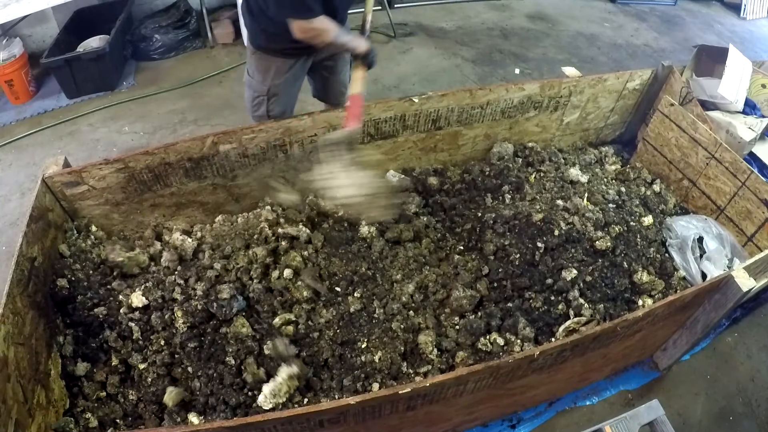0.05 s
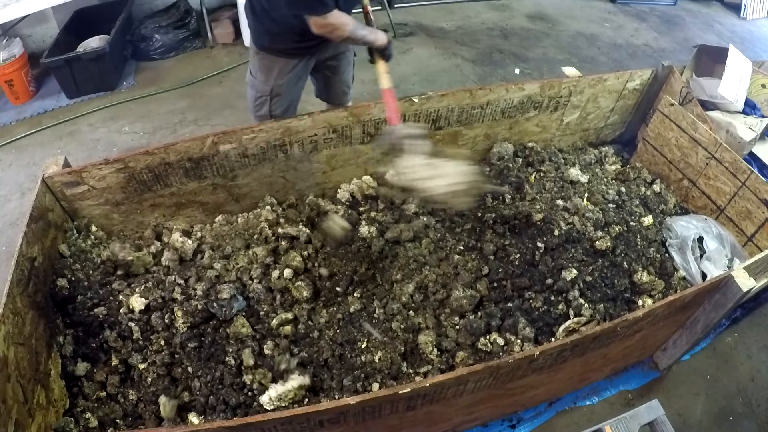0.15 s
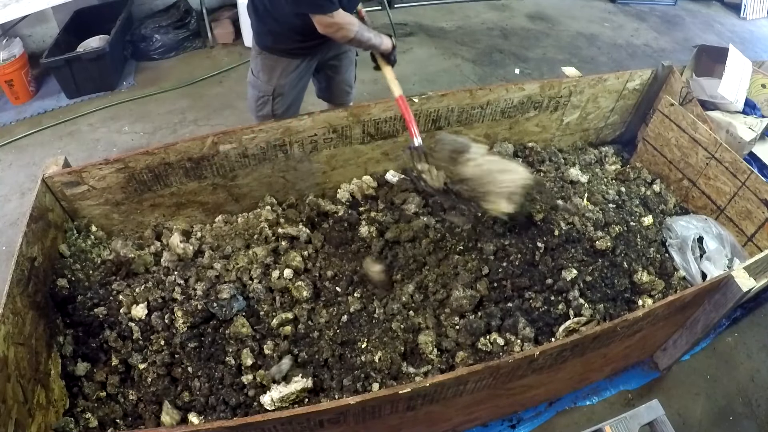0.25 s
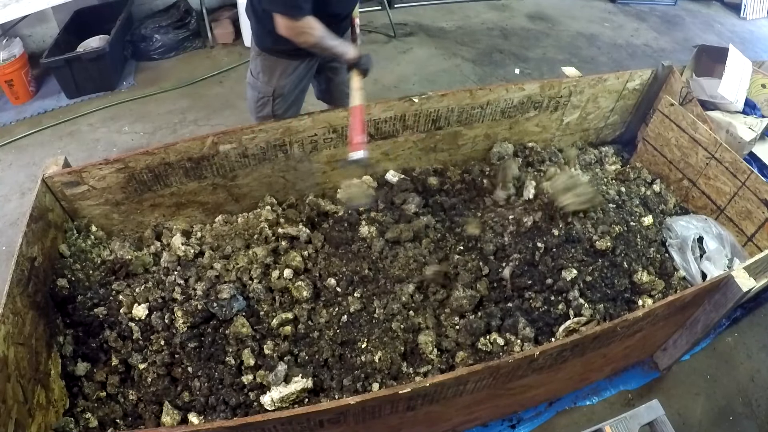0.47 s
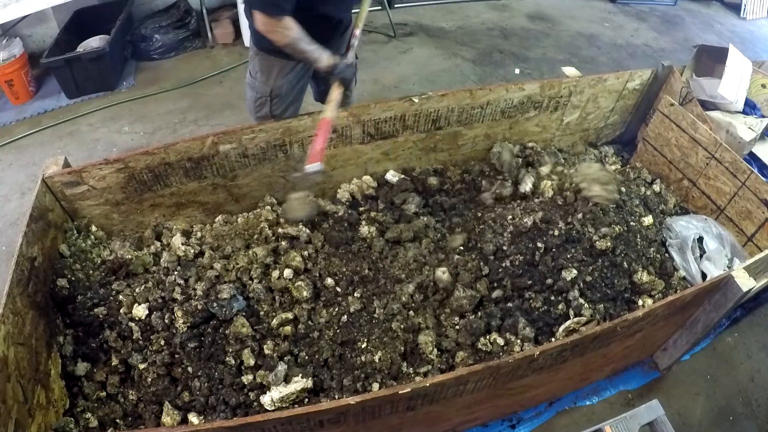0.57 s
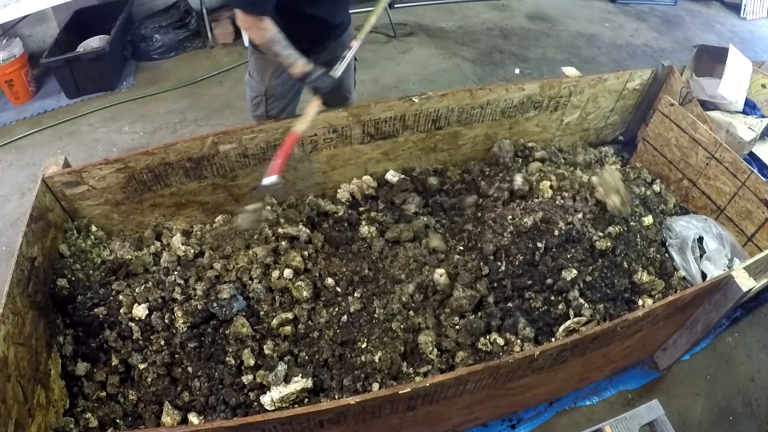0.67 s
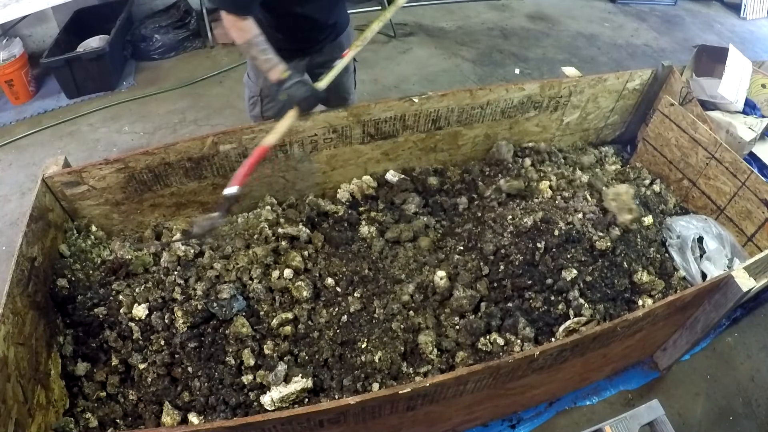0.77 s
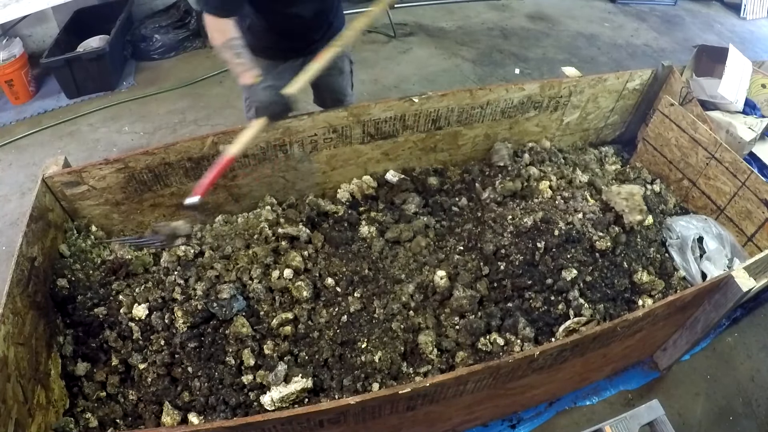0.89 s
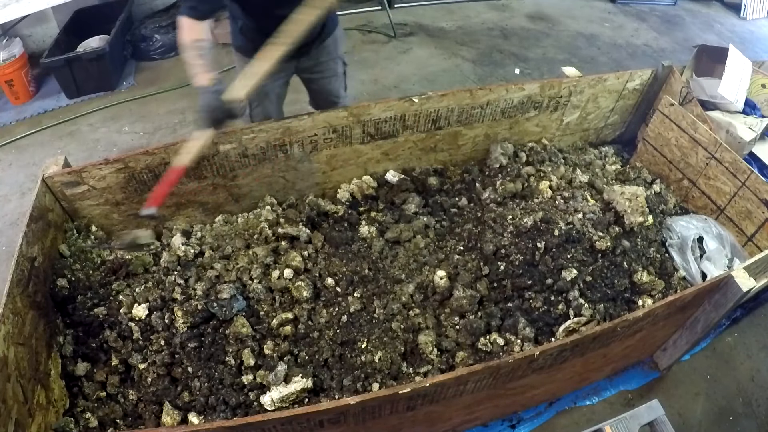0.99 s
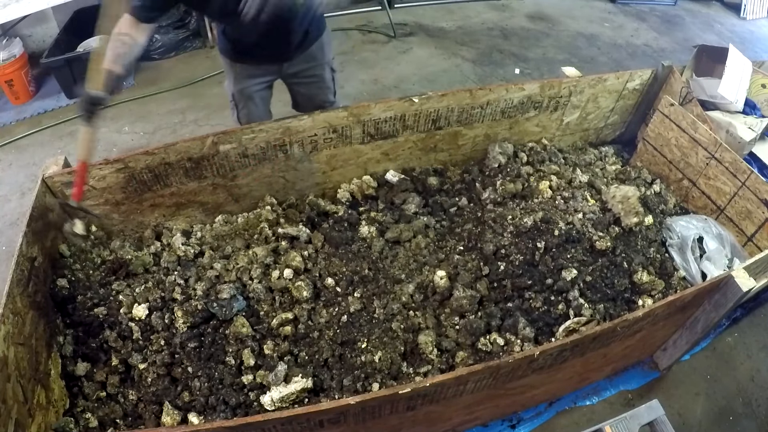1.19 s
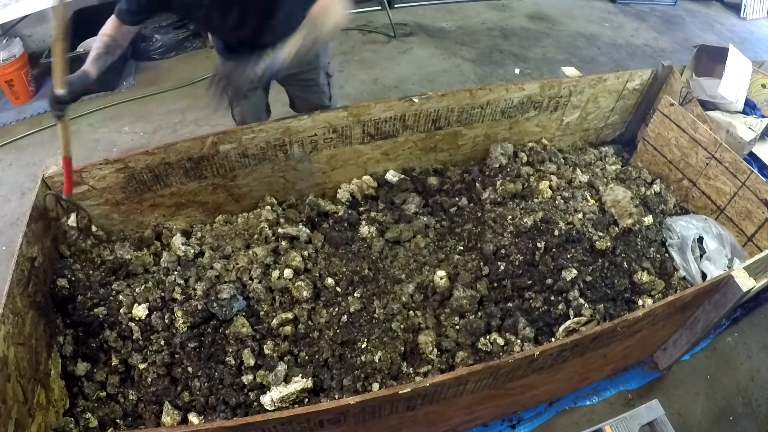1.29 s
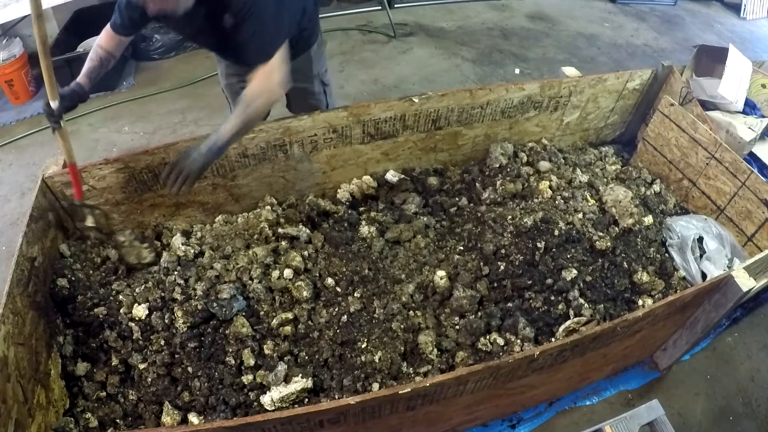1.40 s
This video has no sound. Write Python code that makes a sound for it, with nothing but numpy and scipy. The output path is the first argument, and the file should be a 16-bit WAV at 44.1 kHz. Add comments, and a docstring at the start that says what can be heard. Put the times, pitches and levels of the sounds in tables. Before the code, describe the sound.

A fork turns compost in a wooden bin in a garage. A tossed forkful rustles down and clods patter, with low buffets and one knock near the microphone. The tines clink on the wall, then plunge in with a gritty crunch.

```python
"""A fork turns clumpy compost in a wooden bin in a garage. A flung forkful rustles down, clods patter
and tap the wood, and one crumb knocks close to the microphone, which rumbles with low buffets,
probably of moving air. The steel tines clink on the bin wall, then plunge along the boards and grind
into the gritty heap. Compost is filtered grains and noise; steel and wood ring as decaying modes."""
import sys
import numpy as np
from scipy import signal
from scipy.fft import rfft, irfft
from scipy.io import wavfile
from scipy.ndimage import uniform_filter1d

SR = 44100
rng = np.random.default_rng(int(sys.argv[2]) if len(sys.argv) > 2 else 0)


def to_wav(s):
    """Save 16-bit WAV."""
    ch = np.atleast_2d(s).T  # columns
    pcm = np.round(np.clip(ch, -1, 1) * 32767)  # PCM
    wavfile.write(sys.argv[1], SR, pcm.astype(np.int16))


N = 63945
T = np.arange(N) / SR
CLOD_ATTACK_S, CLOD_T60_S = .0007, .03
STRIKE_ATTACK_S = .0006


def amp(db):
    """Decibels to gain."""
    return 10 ** (np.asarray(db) / 20)


def unit(x):
    """Normalises to rms 1."""
    return x / np.sqrt(np.mean(x ** 2) + 1e-20)


def read(curve, hz):
    """Reads a curve on a log-frequency axis."""
    f, value = np.transpose(curve)
    return np.interp(np.log(hz + 1), np.log(f + 1), value)


def tuned(curve, centre_hz):
    """Turns a curve over frequency ratios into one over Hz."""
    return [(centre_hz * ratio, db) for ratio, db in curve]


def eq(x, curve, tilt_db=0):
    """Minimum-phase EQ of unit power gain, tilted by tilt_db per octave above 200 Hz."""
    size = 8192
    hz = np.fft.rfftfreq(size, 1 / SR)
    gain = unit(amp(read(curve, hz) + tilt_db * np.log2(np.maximum(hz, 200))))
    cepstrum = irfft(np.log(gain + 1e-6))
    cepstrum[1:size // 2] *= 2
    cepstrum[size // 2 + 1:] = 0
    impulse = irfft(np.exp(rfft(cepstrum)))
    return signal.fftconvolve(x, impulse)[:N]


def grains(per_s=5000, spread_db=3):
    """Random tiny fractures of uneven size, rms 1."""
    size = amp(spread_db * np.minimum(rng.exponential(1, N), 4))
    return unit(size * rng.choice([-1, 1], N) * (rng.random(N) < per_s / SR))


def rumble(curve):
    """Filtered noise, levelled over a 70 ms window."""
    noise = unit(eq(rng.standard_normal(N), curve))
    window = np.hanning(2 * int(.035 * SR))
    power = abs(signal.fftconvolve(noise ** 2, window / window.sum(), "same"))
    return noise / np.sqrt(power + .03)


def swell(start, attack, hold, fall, db):
    """Envelope that rises, holds, then loses 20 dB every `fall` seconds."""
    fading = np.maximum(T - start - attack - hold, 0)
    return np.clip((T - start) / attack, 0, 1) * amp(db - 20 * fading / fall)


def hit(start, attack, t60):
    """Percussive envelope."""
    age = np.maximum(T - start, 0)
    return np.minimum(age / attack, 1) * np.exp(-np.log(1000) * age / t60)


def ring(start, modes, attack, scatter=1):
    """Decaying modes; scatter loosens their phases from blow to blow."""
    t = T[:SR // 4]
    out = np.zeros(len(t))
    for hz, db, t60 in modes:
        cycles = hz * t + scatter * rng.random()
        out += amp(db) * np.exp(-np.log(1000) * t / t60) * np.sin(2 * np.pi * cycles)
    return np.pad(out * np.minimum(t / attack, 1), (round(start * SR), N))[:N]


def excited(modes, centre_hz, curve):
    """Rebalances modes for a blow whose energy lies around one frequency."""
    return [(hz, db + read(tuned(curve, centre_hz), hz), t60) for hz, db, t60 in modes]


# room tone EQ: f/Hz, level/dB
ROOM_TONE_EQ = [(15, -5), (60, 2), (140, 2), (280, -2), (420, -6.5), (600, -10), (1700, -17), (2300, -21.5),
                (5000, -25.5), (10000, -29), (15000, -40)]
def room_tone():
    """Steady hush of the garage."""
    return amp(-54.3) * unit(eq(rng.standard_normal(N), ROOM_TONE_EQ))


# sub-bass EQ of the air: f/Hz, level/dB
DRAUGHT_EQ = [(4, -40), (12, -20), (21, -1), (31, 0), (52, -10), (90, -23), (600, -90)]
def draught():
    """A faint, steady draught lays a bed of sub-bass."""
    return amp(-43) * rumble(DRAUGHT_EQ)


# showers of crumbs: t/s, attack/s, hold/s, 20 dB fall/s, level/dB, tilt/(dB per octave)
SPILLS = [(-.02, .02, .02, .3, -55, -2), (.205, .025, .02, .08, -54, -.5),
          (.255, .028, .1, .085, -47.8, -.3), (.42, .04, .2, .2, -68, 3), (.76, .03, .175, .08, -61.3, 3),
          (1.145, .005, .012, .04, -58, -3), (1.262, .004, .012, .03, -61, 4)]
# rustle EQ: f/Hz, level/dB
SPILL_EQ = [(180, -25), (300, -5), (740, -2), (950, -7), (1850, -10), (2830, -17), (9210, -18),
            (15000, -34)]
def spills():
    """Loose crumbs slide and land in a fine-grained rustle."""
    return sum(eq(grains() * swell(*shape), SPILL_EQ, tilt) for *shape, tilt in SPILLS)


# clods on the boards: t/s, level/dB
TAPS = [(.1865, -46.5), (1.144, -49.5)]
# midrange EQ of a tap: f/Hz, level/dB
TAP_EQ = [(300, -16), (900, -7), (1300, 0), (1800, 0), (2300, -13), (15000, -40)]
def taps():
    """Soft clods hit the wood with dull bursts of noise."""
    envelope = sum(amp(db) * hit(start, CLOD_ATTACK_S, CLOD_T60_S) for start, db in TAPS)
    return eq(envelope * rng.standard_normal(N), TAP_EQ)


# pressure bumps: peak t/s, half length/s, level/dB, centre f/Hz
BUFFETS = [(.214, .011, -20, 78), (.232, .02, -16, 28), (.259, .012, -16.5, 104), (.271, .024, -14, 29),
           (.298, .016, -25, 60), (.353, .012, -12.5, 56), (.374, .014, -14.5, 100), (.404, .018, -10, 44),
           (.459, .015, -19, 64), (.496, .014, -15, 36), (.525, .014, -16, 40), (.577, .013, -26, 48),
           (.635, .017, -24.5, 38), (.717, .022, -26, 32), (.92, .018, -33, 50), (.975, .025, -35, 40),
           (1.042, .026, -22, 28), (1.105, .03, -32, 27), (1.21, .028, -32, 26), (1.424, .014, -32, 42)]
# turbulence EQ: f/centre, level/dB
TURBULENCE_EQ = [(.1, -30), (.6, -2), (1.15, 0), (2, -10), (3.5, -28), (8, -65), (20, -115)]
def buffets():
    """Lumps of pressure at the microphone: wavering low tones roughened by turbulence."""
    out = np.zeros(N)
    for peak, half_length, db, hz in BUFFETS:
        drift = uniform_filter1d(rng.standard_normal(N), size=400)
        waver_octaves = .12 * unit(uniform_filter1d(drift, size=400))
        cycles = np.cumsum(hz * 2 ** waver_octaves) / SR + rng.random()
        tone = np.sqrt(2) * np.sin(2 * np.pi * cycles)
        turbulence = amp(-9) * rumble(tuned(TURBULENCE_EQ, hz))
        out += amp(db) * np.exp(-((T - peak) / half_length) ** 2) * (tone + turbulence)
    return out


# small clods landing: t/s, level/dB, tilt/(dB per octave)
PATTERS = [(.229, -53, 0), (.294, -45, 1), (.5125, -49, 2), (.516, -49, 2), (.6754, -53, 0), (.691, -56, 1),
           (.758, -49, 1), (.7615, -47, 1), (.766, -50, 1), (.811, -54, 1), (.8495, -50.5, 0),
           (.921, -54, 0), (.9455, -48, -2), (.9515, -48, -2.5)]
# bright EQ of a landing: f/Hz, level/dB
PATTER_EQ = [(300, -15), (2100, -2), (4000, 0), (9000, -2), (15000, -13)]
def patter():
    """Small clods land as crisp, grainy ticks."""
    return sum(eq(grains() * amp(db) * hit(start, CLOD_ATTACK_S, CLOD_T60_S), PATTER_EQ, tilt)
               for start, db, tilt in PATTERS)


# modes of the knock: f/Hz, relative level/dB, t60/s
KNOCK_MODES = [(255, 4, .038), (600, 0, .008), (950, 1, .007), (1400, 2, .009), (1830, -4, .014),
               (2950, -16, .008), (4000, -15, .006)]
def knock(start=.5355, attack_cycles=1.1):
    """One crumb strikes by the microphone: a dry tick, then a hollow low ring with a slower attack."""
    modes = (ring(start, [(hz, db, t60)], attack_cycles / hz, scatter=0) for hz, db, t60 in KNOCK_MODES)
    return amp(-25) * sum((-1) ** k * mode for k, mode in enumerate(modes))  # alternating polarity


# modes of the wooden bin: f/Hz, relative level/dB, t60/s
BOARD_MODES = [(125, 2, .22), (192, -3, .25), (268, 1, .25), (319, -5, .22), (365, -3, .25), (444, 0, .16),
               (598, -5, .16), (736, 0, .17), (905, -1, .1), (1150, 0, .11), (1615, 3, .12), (1870, 3, .07)]
# spectrum of a dull blow: f/centre, level/dB
THUD_EQ = [(.1, -32), (.35, -14), (.7, -2), (1.15, 0), (1.8, -13), (3, -32), (8, -62)]
def boards(start, centre_hz):
    """The struck bin rings, favouring modes near the centre of the blow."""
    return ring(start, excited(BOARD_MODES, centre_hz, THUD_EQ), attack=.002)


# tines touching the wall: t/s, chatter level/dB, ring level/dB, centre f/Hz
CLINKS = [(1.2068, -42, -41, 3800), (1.2135, -42, -47, 2000), (1.22, -40.5, -43.5, 1350)]
# modes of the steel fork: f/Hz, relative level/dB, t60/s
TINE_MODES = [(510, 9, .17), (1270, -3, .15), (1384, 2, .14), (1455, -2, .16), (1604, 2, .08),
              (1857, -7, .16), (2046, -1, .08), (2912, -11, .13), (3575, -5, .17), (3850, 2, .03),
              (5706, -5, .2)]
# spectrum of a touch: f/centre, level/dB
TOUCH_EQ = [(.25, -16), (.6, -12), (1, 0), (1.6, -6), (3, -14)]
# chatter EQ: f/Hz, level/dB
CHATTER_EQ = [(150, -8), (480, 2), (900, -7), (1500, 0), (2000, -3), (2400, -13), (4000, -7), (4900, -11),
              (5500, -24), (9000, -25), (15000, -40)]
def clink():
    """The tines chatter on the wall, which hums briefly; each touch favours lower modes than the last."""
    chatter = sum(amp(db) * hit(start, STRIKE_ATTACK_S, t60=.078) * rng.standard_normal(N)
                  for start, db, _, _ in CLINKS)
    steel = sum(amp(db) * ring(start, excited(TINE_MODES, hz, TOUCH_EQ), STRIKE_ATTACK_S)
                for start, _, db, hz in CLINKS)
    wall = amp(-44) * boards(CLINKS[0][0], centre_hz=125)
    return eq(chatter, CHATTER_EQ) + steel + wall


# jolts, duller as the fork sinks: t/s, thud level/dB, centre f/Hz, grit level/dB, board level/dB
JOLTS = [(1.2946, -27, 920, -32, -29.5), (1.2995, -35, 900, -35, -39), (1.311, -31, 420, -43, -33),
         (1.3185, -31.5, 650, -29.5, -39), (1.326, -32.5, 470, -43, -35), (1.3455, -28.5, 600, -40, -36),
         (1.353, -31.5, 400, -47, -36), (1.383, -38, 380, -50, -40)]
# crushed grit EQ: f/Hz, level/dB
GRIT_EQ = [(200, -20), (1000, -8), (1500, -1), (1850, 0), (2250, -14), (3800, -11), (5000, -15),
           (6000, -24), (9000, -24), (15000, -45)]
def plunge():
    """The fork jolts down the wall: each jolt layers a thud, a spurt of grit and ringing boards."""
    out = np.zeros(N)
    for start, thud_db, hz, grit_db, board_db in JOLTS:
        thud = eq(rng.standard_normal(N) * hit(start, STRIKE_ATTACK_S, t60=.09), tuned(THUD_EQ, hz))
        grit = eq(grains(spread_db=1.5) * hit(start, STRIKE_ATTACK_S, t60=.075), GRIT_EQ)
        out += amp(thud_db) * thud + amp(grit_db) * grit + amp(board_db) * boards(start, hz)
    return out


# low-end EQ of the heap: f/Hz, level/dB
HEAVE_EQ = [(20, -30), (85, -3), (130, 0), (165, -6), (700, -75)]
def heave():
    """The mass of compost gives a deep thump as the fork sinks in."""
    return swell(start=1.312, attack=.045, hold=.035, fall=.04, db=-33) * rumble(HEAVE_EQ)


# resonances of the scraping tines: f/Hz, bandwidth/Hz, relative level/dB
SCRAPE_MODES = [(1750, 60, -13), (2120, 70, -12), (2465, 40, -12), (2880, 120, -12), (3820, 150, -15)]
# lumps cracking: t/s, level/dB, tilt/(dB per octave), squeak f/Hz, squeak level/dB
CRACKS = [(1.3453, -41, 2, 4000, -42), (1.3705, -45, 3, 5900, -48), (1.3785, -35, 1, 2850, -38),
          (1.3855, -38, 0, 2900, -40), (1.3945, -34, 2, 2480, -39), (1.405, -38, -1, 1520, -39),
          (1.4195, -43, 1.5, 2110, -35)]
# EQ of grinding and cracking compost: f/Hz, level/dB
CRUNCH_EQ = [(40, -14), (70, -4), (120, 0), (285, -6), (367, 0), (600, -11), (920, -9), (1400, -12),
             (2100, -16), (3500, -18), (6000, -24.5), (9000, -25.5), (11000, -30), (15000, -51)]
def crunch():
    """Grit grinds under the tines and sets them ringing; lumps crack, each with a squeak of steel."""
    grit = grains(per_s=1800) * swell(start=1.345, attack=.03, hold=.03, fall=.125, db=-39.3)
    out = eq(grit, CRUNCH_EQ)
    for hz, width, db in SCRAPE_MODES:
        mode = np.exp(-np.pi * width * T) * np.sin(2 * np.pi * hz * T)
        out += amp(db) * signal.fftconvolve(grit, mode / np.linalg.norm(mode))[:N]
    for start, db, tilt, hz, squeak_db in CRACKS:
        crack = grains(spread_db=1.5) * hit(start, STRIKE_ATTACK_S, t60=.04)
        squeak = ring(start, [(hz, squeak_db, .07)], attack=.002)
        out += amp(db) * eq(crack, CRUNCH_EQ, tilt) + squeak
    return out


# reverb time of the garage: f/Hz, t60/s
GARAGE_DECAY = [(100, .5), (1000, .45), (4000, .35), (15000, .18)]
def garage_reverb(x):
    """A diffuse tail whose highs die first."""
    hz, t, spectrum = signal.stft(rng.standard_normal(N), SR, nperseg=256)
    decay = np.exp(-np.log(1000) * t / read(GARAGE_DECAY, hz)[:, None])
    tail = signal.istft(spectrum * decay, SR, nperseg=256)[1][:N]
    tail *= np.minimum(T / .012, 1)  # 12 ms fade-in
    return signal.fftconvolve(x, tail / np.linalg.norm(tail))[:N]


def scene():
    """Mono mix: fork and compost feed the reverb; the close knock, air and room tone stay dry."""
    work = spills() + patter() + taps() + clink() + plunge() + heave() + crunch()
    reverb = amp(-12) * garage_reverb(work)
    return (work + reverb + knock() + draught() + buffets() + room_tone())[None]


def record(dry):
    """Steep high cut at 15.4 kHz."""
    lowpass = signal.firwin(511, 15400, window=("kaiser", 9), fs=SR)
    return signal.oaconvolve(dry, lowpass[None], "same")


dry = scene()
out = record(dry)
to_wav(out)
```